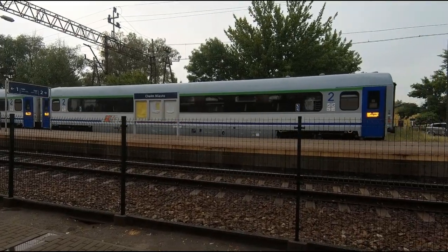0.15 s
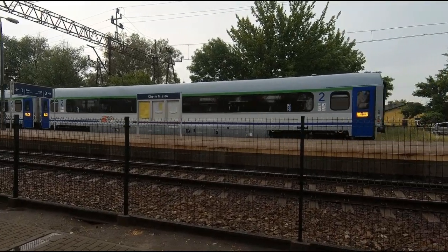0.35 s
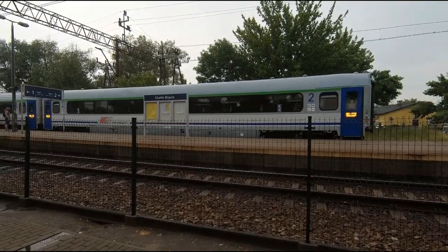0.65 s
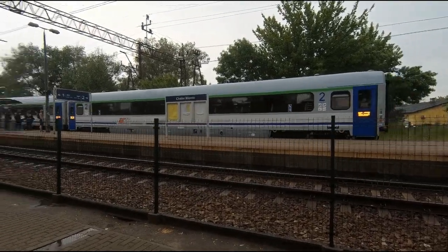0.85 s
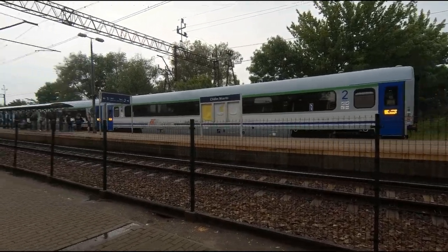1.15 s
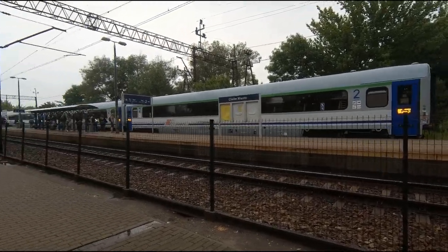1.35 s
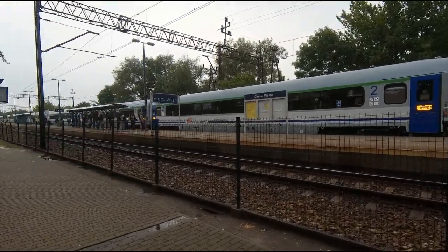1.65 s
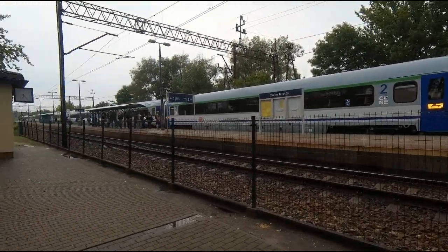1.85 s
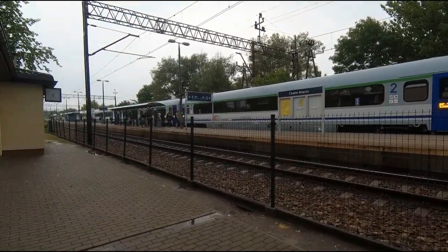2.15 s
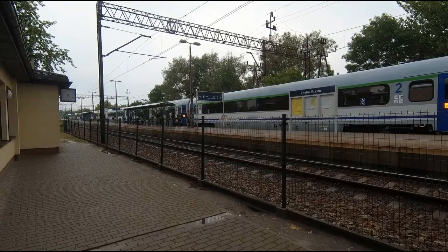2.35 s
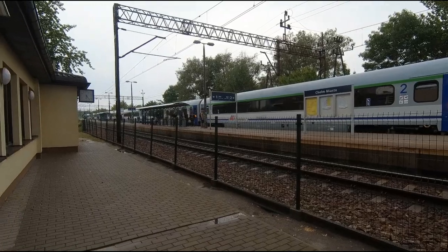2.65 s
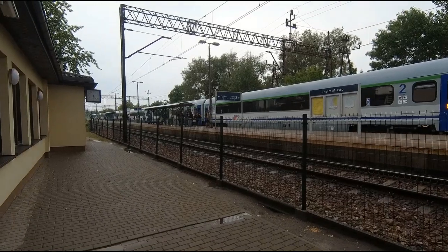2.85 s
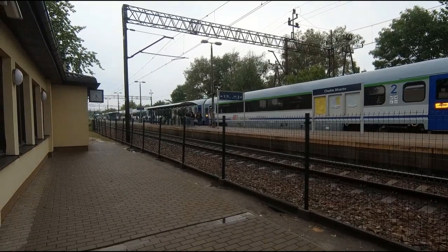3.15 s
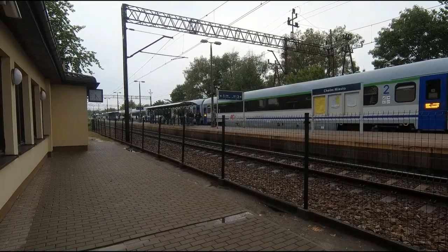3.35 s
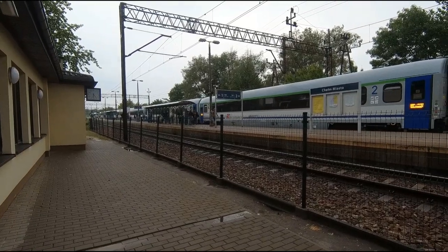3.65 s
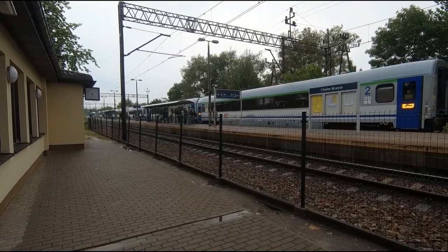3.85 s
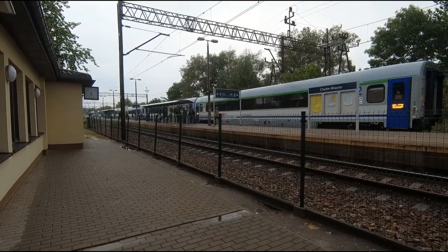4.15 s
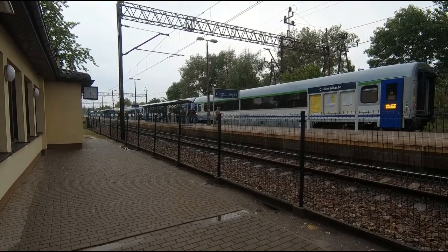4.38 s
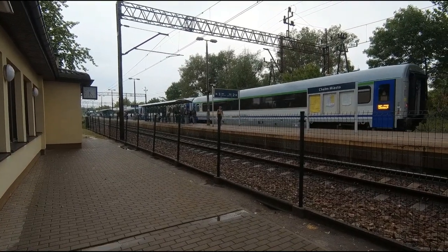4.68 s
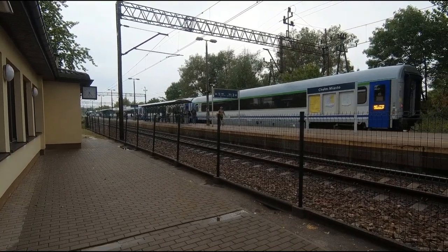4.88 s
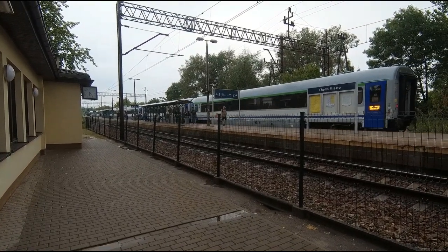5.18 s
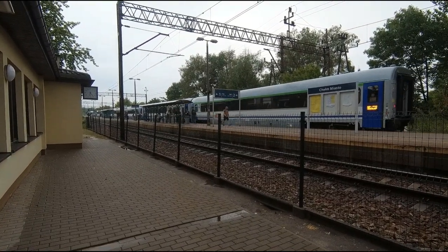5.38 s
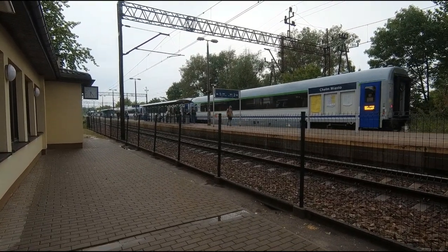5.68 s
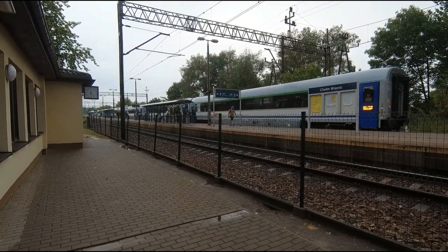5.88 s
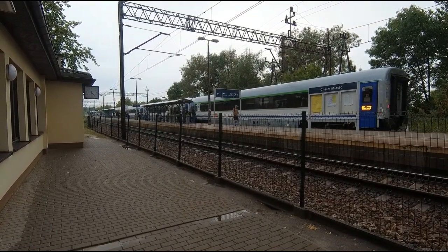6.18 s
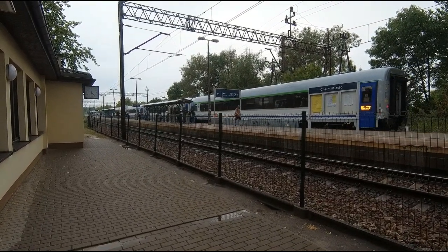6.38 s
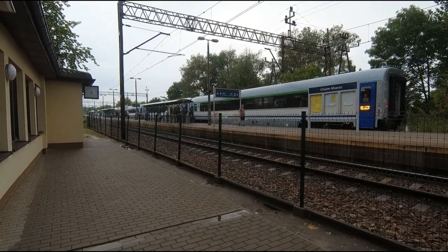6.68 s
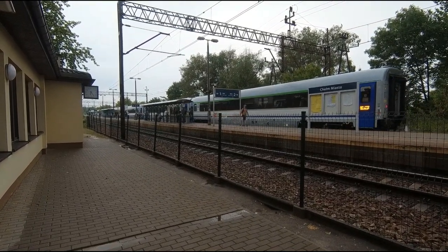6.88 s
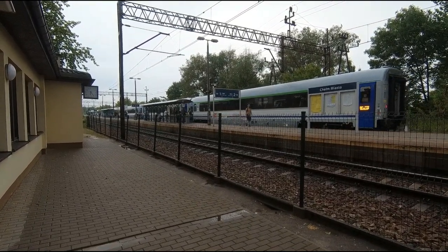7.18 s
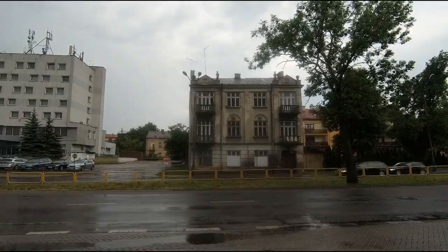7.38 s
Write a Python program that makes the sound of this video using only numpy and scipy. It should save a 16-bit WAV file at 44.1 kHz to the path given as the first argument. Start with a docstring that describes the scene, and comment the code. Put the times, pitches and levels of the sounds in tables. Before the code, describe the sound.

Open-air station, stereo microphone near the track. From 0 to 1.4 s coaches roll past with a muffled mid-range roar and low rumble, a faint hiss swelling and a rough moan starting near 1 s. At about 1.5 s the brakes bite: a piercing squeal around 4.5 kHz leaps up and holds its pitch, several wheels beating together, with fainter tones an octave below and above. It flickers, drops out briefly near 2.4, 3.4 and 3.9 s, and flares again. Hissing grit, rasping and tiny squeaks surround it. The buzzy groan, roughly 600-730 Hz, strengthens and wavers from 4 s as the rolling fades; soft thuds come near 5 s. From 6.2 s grinding and groan ebb, the squeal falters and dies by 7 s, leaving thin whistling tones. At 7.28 s it cuts to a tiny silence, then a dull, steady wash of distant wet-street traffic.

```python
"""Train wheels squeal on one high mode, beating against each other, as coaches brake to a stop at a platform.
Brake blocks grind (shaped noise and short squeaks) and groan (a pitch-scattered stick-slip tone) over rolling noise.
Broad wheel modes squawk at speed; thin tones swell and fade as the train comes to rest.
After a brief silence a second scene follows: far traffic on a wet street, as shaped noise."""
import sys
import numpy as np
from scipy import signal
from scipy.fft import rfft, irfft
from scipy.io import wavfile
from scipy.ndimage import uniform_filter1d

SR = 44100
rng = np.random.default_rng(int(sys.argv[2]) if len(sys.argv) > 2 else 0)


def bounce(signal):
    """Save signal as a 16-bit WAV file at the path given by the first command-line argument."""
    frames = np.transpose(np.atleast_2d(signal))
    limited = np.clip(frames, -1, 1)
    pcm = np.round(limited * 32767).astype(np.int16)
    wavfile.write(sys.argv[1], SR, pcm)


N = 332100
T = np.arange(N) / SR
FREQS = np.fft.rfftfreq(N, 1 / SR) + 1e-3  # offset keeps the log finite

# even braking; SPEED is the share of the starting speed
STOP_S = 7.15
SPEED = np.clip(1 - T / STOP_S, .003, 1)

# Friction of blocks on treads, which drives grinding and squeal.
# Each row: time in seconds, level in dB.
FRICTION_LEVEL = [(1.6, -58.5), (1.9, -55.5), (2.65, -56.5), (2.83, -54), (3.08, -56), (3.42, -52),
                  (3.58, -54), (3.73, -50.5), (4.02, -55), (4.28, -51), (4.46, -53.1), (4.62, -50),
                  (5.2, -53), (5.48, -51.5), (5.7, -54.5), (6.25, -52.5)]
# Relative spectrum of the fine hiss. Each row: frequency in Hz, density in dB per Hz.
HISS_SPECTRUM = [(500, -18.5), (1200, -18.5), (2000, 0), (3200, -1.5), (4800, 0.5), (6000, -1), (8200, -1),
                 (10000, -3), (12000, -4), (14000, -9), (15500, -19)]


def undb(db):
    """Decibels to gain."""
    return 10 ** (np.asarray(db) / 20)


def unit(x):
    """Scale to rms 1."""
    return x / np.sqrt(np.mean(np.abs(x) ** 2))


def curve(table):
    """(s, value) points joined linearly, sample by sample."""
    s, value = np.transpose(table)
    return np.interp(T, s, value)


def across(points):
    """(Hz, value) points joined on a log-frequency axis."""
    hz, value = np.transpose(points)
    return np.interp(np.log(FREQS), np.log(hz), value)


def walk(rate_hz):
    """Smooth random signal of rms 1 that changes about rate_hz times a second."""
    lowpass = 1 / (1 + (2 * FREQS / rate_hz) ** 4)
    return unit(irfft(rfft(rng.standard_normal(N)) * lowpass, N))


def phase_of(hz):
    """Running phase of an oscillation, in radians."""
    return 2 * np.pi * np.cumsum(hz) / SR


def envelope(start_s, attack_s, ebb_s, release_s):
    """Linear rise from start_s, hold, and linear fall from ebb_s."""
    rise = np.clip((T - start_s) / attack_s, 0, 1)
    fall = np.clip(1 - (T - ebb_s) / release_s, 0, 1)
    return rise * fall


def bell(when_s, half_length_s):
    """Gaussian swell of height 1, down to 1/e at half_length_s."""
    return np.exp(-((T - when_s) / half_length_s) ** 2)


def rises(table):
    """Summed level change in dB of (s, half length s, dB) swells."""
    return sum(db * bell(s, half_s) for s, half_s, db in table)


def resonances(table):
    """Gain of a set of (Hz, width Hz, dB) modes with steep flanks."""
    power = 0
    for hz, width_hz, db in table:
        power = power + undb(2 * db) / (1 + 2 * ((FREQS - hz) / width_hz) ** 2) ** 2
    return np.sqrt(power)


def spread(gain, grain_db=0):
    """Dense micro-impacts of uneven size from a wide source, coloured by gain; ports most alike in the bass."""
    # Each row: frequency in Hz, likeness of the two microphone ports from 0 to 1.
    likeness = [(60, .94), (300, .88), (700, .92), (1400, .8), (2400, .6), (4200, .65), (5500, .45),
                (7800, .45), (9000, .35), (12000, .28), (14000, .05)]
    sizes = undb(grain_db * rng.standard_normal(N))
    mid, side = rfft(rng.standard_normal((2, N)) * sizes) * gain
    alike = np.clip(across(likeness), 0, 1)
    mid = irfft(mid * np.sqrt(1 + alike), N)
    side = irfft(side * np.sqrt(1 - alike), N)
    return (mid + np.array([[1], [-1]]) * side) / np.std(mid)


def steady(x, seconds):
    """Hold the slow level of a stereo sound at 1 and keep its quick beats."""
    size = int(seconds * SR)
    power = uniform_filter1d((x ** 2).mean(axis=0), size)
    power = uniform_filter1d(power, size)
    return x / np.sqrt(np.abs(power) + 1e-9)


def station(x, echo_db, t60_s, apart=.5):
    """Direct sound plus scattered echoes from platform, coach sides and house front, partly shared by the ports."""
    t = T[:SR // 2]
    common, own = rng.standard_normal(len(t)), rng.standard_normal((2, len(t)))
    decay = np.exp(-np.log(1000) * t / t60_s) * (t > .004)
    tail = (common + apart * own) * decay
    tail *= undb(echo_db) / np.sqrt(np.sum(tail ** 2, axis=1, keepdims=True))
    return x + signal.fftconvolve(x[None], tail, axes=1)[:, :N]


def grip():
    """Strength of the blocks' rubbing: a quick bite, a hold and an ebb."""
    return envelope(start_s=1.465, attack_s=.092, ebb_s=6.194, release_s=.67)


def build_up():
    """Strength of the self-excited wheel mode: exponential growth, hold, exponential decay."""
    full_s, grow_db_per_s = 1.56, 77
    fade_s, die_db_per_s = 6.382, 50
    growing_db = -grow_db_per_s * np.maximum(full_s - T, 0)
    dying_db = -die_db_per_s * np.maximum(T - fade_s, 0)
    return undb(growing_db + dying_db)


def street():
    """Far traffic on wet asphalt: steady noise with a broad, low-weighted spectrum."""
    # Each row: frequency in Hz, relative density in dB per Hz.
    street_spectrum = [(18, -34), (30, -10.5), (107, -4.5), (228, -7), (364, -9), (448, -14.5), (645, -4.5),
                       (735, -8.5), (1170, -10.5), (1780, -15.5), (1920, -16), (15000, -45)]
    street_db = -56.5
    return undb(street_db) * spread(undb(across(street_spectrum)))


def air():
    """A faint, smooth hiss swells and fades before the blocks bite."""
    # Each row: time in seconds, half length in seconds, level in dB.
    early_swells = [(0.817, 0.35, -65)]
    swell = sum(undb(db) * bell(s, half_s) for s, half_s, db in early_swells)
    return swell * spread(undb(across(HISS_SPECTRUM)))


def rolling():
    """Roar of wheels on rails, its power falling with speed, over a low rumble and soft jolts."""
    # Each row: frequency in Hz, relative density in dB per Hz.
    roar_spectrum = [(210, -60), (350, -19.5), (437, -9), (496, -23.5), (619, -9), (681, -0.5), (878, -2.5),
                     (1240, -4.5), (1480, 1.5), (1790, -2), (4090, -5.5), (6580, -16.5), (14100, -25),
                     (15500, -34)]
    rumble_spectrum = [(20, -28), (40, -2), (58, 1), (80, -1), (120, -4.5), (230, -5), (380, -11.5),
                       (700, -11), (2000, -28)]
    # Bogies jolt as the coaches bunch up. Each row: time in seconds, level in dB.
    jolt_levels = [(4.88, -56), (5.06, -59), (5.68, -68)]
    roar_db = -56.3  # at full speed
    rumble_db, rumble_speed_db = -70, 7  # at rest, and rise at full speed
    swell_db, throb_db = .4 * walk(12), 1.2 * walk(14)
    roar = undb(roar_db + swell_db) * np.sqrt(SPEED) * spread(undb(across(roar_spectrum)), grain_db=2)
    jolts = sum(undb(db) * bell(s, .036) for s, db in jolt_levels)
    thuds = jolts * spread(resonances([(75, 57, 0)]))
    rumble_gain = undb(rumble_db + rumble_speed_db * SPEED + throb_db)
    rumble = rumble_gain * spread(undb(across(rumble_spectrum)))
    return roar + thuds + rumble


def last_tones():
    """Single wheel modes swell and fade near the last turn, steadier in pitch as the tread slows."""
    # Each row: start, peak and end in seconds, frequency in Hz, level in dB before lift_db.
    thin_tones = [(6.3, 6.98, 7.3, 1755, -66.5), (6.98, 7.08, 7.22, 1906, -72), (6.7, 7.15, 7.4, 2207, -81),
                  (6.5, 6.9, 7.5, 2929, -77), (6.55, 6.78, 7.0, 7965, -67), (6.5, 6.68, 7.0, 13520, -71),
                  (5.5, 5.95, 6.7, 2590, -58.5), (5.95, 6.2, 6.45, 5085, -57.5),
                  (5.6, 6.15, 6.8, 3880, -60), (5.75, 5.92, 6.08, 7105, -61), (6.48, 6.58, 6.68, 7830, -66),
                  (7.08, 7.22, 7.36, 4498, -79)]
    lift_db = 3.5
    out = np.zeros(N)
    waver = np.interp(T, [6.3, 6.8], [.005, .0015])  # rms share of pitch
    for start, peak, end, hz, db in thin_tones:
        swell = np.sin(np.pi / 2 * np.interp(T, [start, peak, end], [0, 1, 0])) ** 2
        flicker_db = 2.5 * walk(16)
        tone = np.sin(phase_of(hz * (1 + waver * walk(67.4))))
        out += undb(db + flicker_db) * swell * tone
    return undb(lift_db) * station(out, echo_db=-7, t60_s=.3, apart=1.1)


def squawk():
    """While the blocks grip at speed, wheel modes are torn too roughly to hold a pitch: narrow-band noise."""
    # Broad wheel resonances. Each row: frequency in Hz, width in Hz, level in dB.
    squawk_modes = [(2170, 220, -55.5), (4510, 270, -51)]
    full_above_speed = .47  # share of starting speed
    torn = np.minimum(SPEED / full_above_speed, 1) ** 2
    drives = grip(), build_up() ** .63  # lower mode follows the rubbing, upper one the squeal
    out = 0
    for drive, (hz, width_hz, db) in zip(drives, squawk_modes):
        flicker_db = 1.3 * walk(20)
        out = out + drive * undb(db + flicker_db) * spread(resonances([(hz, width_hz, 0)]))
    return torn * out


def groan():
    """The blocks stick and slip: a ragged, buzzy moan that grows and turns into a tone as the train slows."""
    # Each row: time in seconds, pitch in Hz.
    groan_pitch = [(1, 725), (2.3, 735), (3.02, 695), (3.45, 730), (3.9, 735), (4.15, 690), (4.38, 730),
                   (4.55, 632), (4.7, 700), (4.86, 625), (5, 660), (5.2, 610), (5.36, 655), (5.52, 610),
                   (5.76, 658), (5.94, 605), (6.28, 584), (6.7, 655)]
    # Surges and let-ups. Each row: time in seconds, half length in seconds, change in dB.
    moan_changes = [(1.03, .11, 8.5), (2.65, 0.035, 5), (2.87, 0.059, 6.5), (3.25, 0.11, -4.5),
                    (3.51, 0.029, 7), (3.88, 0.1, 6), (4.2, 0.092, -5), (4.41, 0.015, 12), (4.55, .05, 4.5),
                    (4.7, 0.046, -5), (4.88, 0.062, 5.5), (5.02, 0.044, 3), (5.6, 0.29, 2), (6.4, 0.015, 5)]
    groan_db, groan_speed_db = -48.5, -19.5  # at rest, and change at full speed
    scatter = .015 + .1 * SPEED
    scattered = 1 + scatter * (.9 * walk(130) + .4 * walk(25))
    phase = phase_of(curve(groan_pitch) * scattered)
    second_db = -3 - 22 * SPEED ** 3
    upper_db = -5 + 10 * np.log10(SPEED)
    # sudden slips give harmonics, strongest where they meet wheel modes
    harmonics = [(3, .7), (4, 1), (5, .6), (6, 1.2), (8, .8)]  # order, size
    upper = sum(size * np.sin(k * phase) for k, size in harmonics)
    tone = np.sin(phase) + undb(second_db) * np.sin(2 * phase) + undb(upper_db) * upper
    # a second block moans more faintly, a little higher
    second_block = np.sin(phase_of(755 * (1 + .06 * walk(130))))
    tone += undb(-13 + 3 * walk(12)) * second_block
    flutter = undb(1.6 * walk(35))
    moan = steady(station(tone, echo_db=4, t60_s=.34, apart=.25), seconds=.051) * flutter
    # small blocks radiate little below their lowest mode
    moan = signal.sosfilt(signal.butter(6, 525, "high", fs=SR, output="sos"), moan)
    slipping = envelope(start_s=.8, attack_s=.2, ebb_s=6.045, release_s=.83) ** .63
    return undb(groan_db + groan_speed_db * SPEED + rises(moan_changes)) * slipping * moan


def squeaks(count, low_hz, high_hz, mean_length_s, glide):
    """Grit catches and lets go: each catch sings briefly on one of the many modes of wheel and rigging."""
    out, t = np.zeros(N), np.arange(SR // 6) / SR
    for when, pitch, length, bend, size in rng.random((count, 5)):
        hz = low_hz + (high_hz - low_hz) * pitch
        age = np.minimum(t / (mean_length_s * (.5 + length)), 1)
        tone = np.sin(phase_of(hz * (1 + glide * (2 * bend - 1) * age)))
        start = int(when * (N - len(t)))
        out[start:start + len(t)] += (.5 + size) * np.sin(np.pi * age) ** 2 * tone
    return unit(station(out, echo_db=-1, t60_s=.4, apart=1.4))


def grinding():
    """Grit tears along the treads: a hiss, a coarser rasp full of squeaks, and the wheel resonances they ring."""
    # Each row: frequency in Hz, relative density in dB per Hz.
    rasp_spectrum = [(500, -22.5), (800, -5), (1020, -9), (1250, -3.5), (1600, 0), (2400, -9), (3300, -2.5),
                     (5000, -22), (8000, -27)]
    # Wheel and rigging modes. Each row: frequency in Hz, width in Hz, relative level in dB.
    ring_modes = [(1513, 32, -4), (1923, 60, 4), (2257, 64, 6.5), (2625, 160, -1.5), (3823, 285, 2),
                  (4570, 97, -0.5), (5190, 91, -2), (5410, 35, -1), (6210, 35, 0), (6830, 22, 7.5),
                  (6870, 48, -5), (9010, 220, -1.5), (9900, 62, -10), (12830, 86, -8), (13700, 200, -12)]
    # Scrapes that stand out of the rasp. Each row: time in seconds, half length in seconds, rise in dB.
    scrape_rises = [(1.92, 0.025, 8), (2.24, 0.057, 7), (4.38, 0.088, 4), (4.63, 0.12, 5.5),
                    (5.5, 0.013, 8.5), (6.25, 0.064, 4.5)]
    # against the friction level; rasp_speed_db is the change at full speed
    hiss_db, rings_db, rasp_db, rasp_speed_db = 2.5, 2, 4, -11
    chatter_db, flare_db, catch_db = 1.2 * walk(21), 2.1 * walk(54), .68 * walk(15)
    hiss = undb(hiss_db) * spread(undb(across(HISS_SPECTRUM)), grain_db=4)
    catches = squeaks(count=900, low_hz=1350, high_hz=4000, mean_length_s=.06, glide=.02)
    scrape = .6 * spread(undb(across(rasp_spectrum)), grain_db=5) + .75 * catches
    rasp = undb(rasp_db + rasp_speed_db * SPEED + rises(scrape_rises) + catch_db) * scrape
    rings = undb(rings_db + flare_db) * spread(resonances(ring_modes))
    return (hiss + rasp + rings) * undb(curve(FRICTION_LEVEL) + chatter_db) * grip()


def wheel_phases(hz, rough, count):
    """Each wheel sings on the same mode, its pitch shaken independently by the rough tread."""
    return [phase_of(hz + rough * (11 * walk(35) + 12 * walk(500))) for _ in range(count)]


def chorus(phases, order, step_db, apart):
    """One harmonic of all the wheels, each weaker than the last, beating in the station's echoes."""
    tone = sum(undb(k * step_db) * np.sin(order * p) for k, p in enumerate(phases))
    return steady(station(tone, echo_db=1, t60_s=.6, apart=apart), seconds=.06)


def squeal():
    """Friction drives the wheels into steady oscillation, cleaner as they slow."""
    # Main wheel mode. Each row: time in seconds, pitch in Hz.
    squeal_pitch = [(1.3, 4492), (2.8, 4487), (4.5, 4491), (6.2, 4495), (6.8, 4506), (7.2, 4498)]
    # Flares and falterings. Each row: time in seconds, half length in seconds, change in dB.
    flare_changes = [(1.68, 0.057, 5), (2.19, 0.019, -9), (2.45, 0.02, -15), (2.8, 0.038, 6),
                     (3.15, 0.044, 7), (3.39, 0.014, -14), (3.72, 0.025, 4), (3.91, 0.027, -12),
                     (4.08, 0.029, 7.5), (4.34, .04, 6), (4.82, 0.086, -4), (5.17, 0.04, 4),
                     (5.83, 0.086, 6), (6.08, 0.033, 4.5), (6.36, 0.031, -13), (6.59, 0.024, -7.5),
                     (6.68, 0.054, 7)]
    # against the friction level; main_speed_db is the change at full speed
    main_db, main_speed_db, overtone_db = 18, -3, -2
    third_db = -4.5  # against the lower mode
    hz = curve(squeal_pitch)
    rough = np.interp(T, [1.6, 4.6, 5.8, 6.9], [1.3, 1.15, .7, .5])
    main = wheel_phases(hz, rough, count=3)
    lower = wheel_phases(hz / 2, rough, count=3)
    # the rough tread shakes the level, less as the train slows
    flutter_db = 1.1 * walk(34) + 1 * SPEED * walk(120)
    singing = build_up() * envelope(start_s=1.2, attack_s=.15, ebb_s=7.0, release_s=.13)
    wheels = chorus(main, order=1, step_db=-4.5, apart=.85)
    level_db = main_db + main_speed_db * SPEED + rises(flare_changes) + flutter_db
    out = undb(level_db) * singing * wheels
    # overtones sound only while the oscillation is saturated
    saturated = envelope(start_s=1.355, attack_s=.13, ebb_s=6.465, release_s=.47)
    overtones = chorus(main, order=2, step_db=-3, apart=1.5)
    overtones += undb(-11.5) * chorus(main, order=3, step_db=-14, apart=3)
    overtone_flutter_db = 1.5 * walk(24)
    out += undb(overtone_db + overtone_flutter_db) * saturated * overtones
    # a weaker wheel mode an octave below, with its third harmonic
    below = chorus(lower, order=1, step_db=-2, apart=1.3)
    third = chorus(lower, order=3, step_db=-4, apart=1.0)
    lower_flutter_db = 2 * walk(16)
    out += undb(lower_flutter_db) * grip() * (below + undb(third_db) * third)
    return undb(curve(FRICTION_LEVEL)) * out


def at_ports(x):
    """Level and phase differences between the two microphone ports, by frequency."""
    # Each row: frequency in Hz, left minus right level in dB.
    balance = [(100, -.8), (400, -.8), (650, 1.5), (1000, .4), (1600, 2), (2400, 3.2), (4400, 2.5),
               (5200, .3), (7500, -.6), (9000, -3.5), (12500, -4), (13500, -7), (15000, -3.5)]
    # Each row: frequency in Hz, lead of the left port in radians.
    lead = [(100, 0), (600, .2), (1500, .5), (1850, .4), (2250, 1.2), (2700, .5), (4500, .7), (6000, .5),
            (6750, 1.1), (7800, .4), (9000, 1.8), (11000, 2.8)]
    # coaches stretch away to the left; the microphone body shades each port differently
    ports = np.array([[1], [-1]]) / 2
    shading = undb(ports * across(balance)) * np.exp(1j * ports * across(lead))
    return irfft(rfft(x) * shading, N)


def scene():
    """The train, a brief silence, then the wet street."""
    cut_s, resume_s = 7.283, 7.318  # midpoints of the fades
    train = air() + rolling() + last_tones() + squawk() + groan() + grinding() + squeal()
    train_fade = np.clip((cut_s - T) / .02 + .5, 0, 1)
    street_fade = np.clip((T - resume_s) / .024 + .5, 0, 1)
    return at_ports(train) * train_fade + street() * street_fade


def record(dry):
    """Steep elliptic low-pass: the microphone chain passes little above top_hz."""
    top_hz = 15400
    return signal.sosfilt(signal.ellip(8, .2, 70, top_hz, fs=SR, output="sos"), dry)


dry = scene()
out = record(dry)
bounce(out)
```